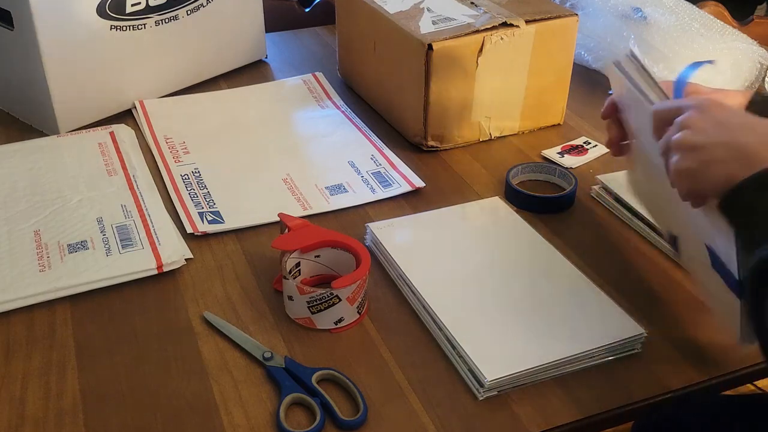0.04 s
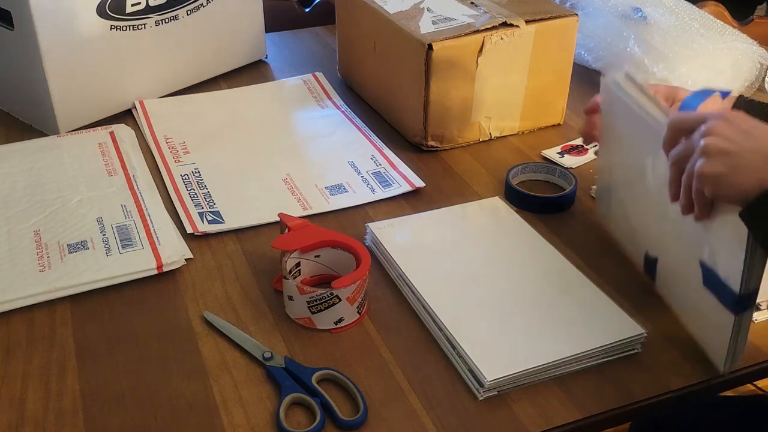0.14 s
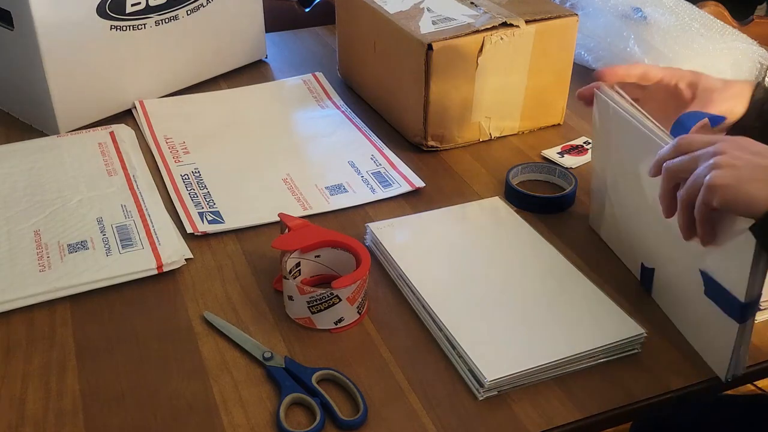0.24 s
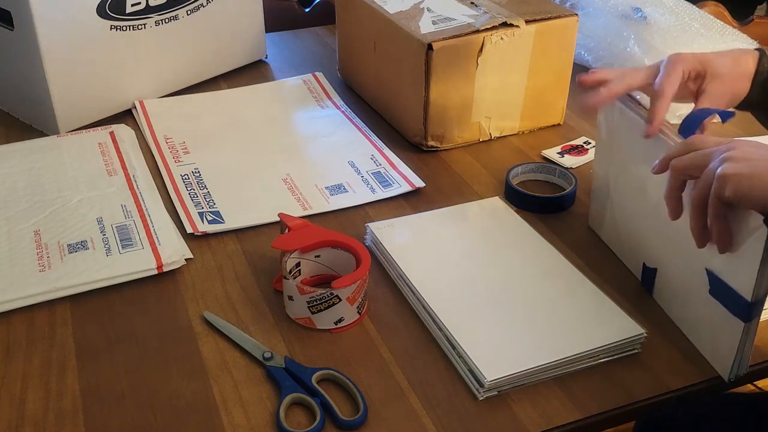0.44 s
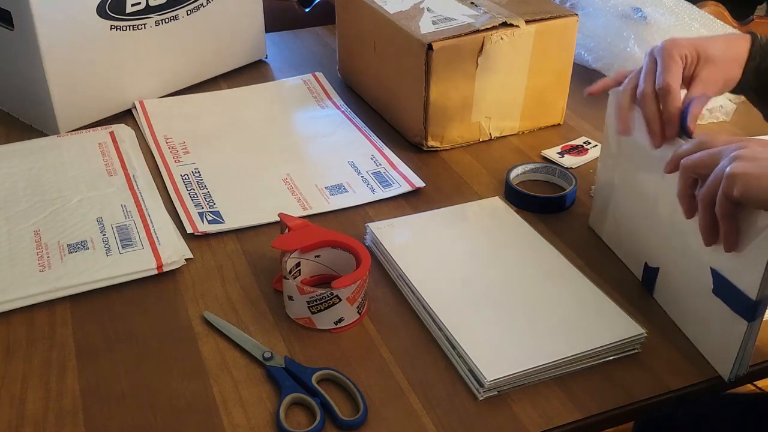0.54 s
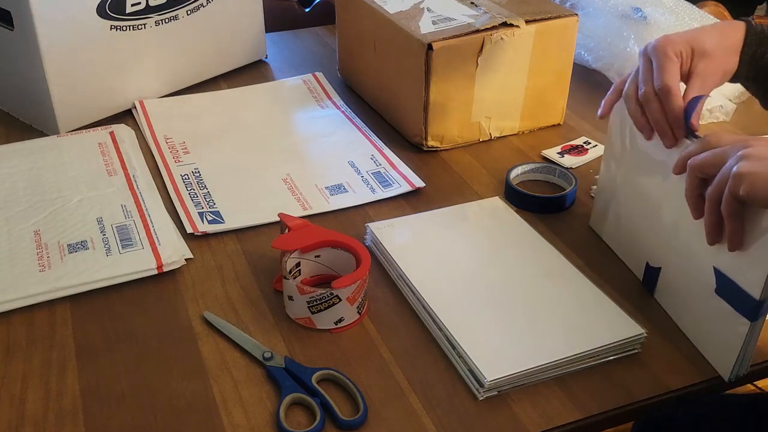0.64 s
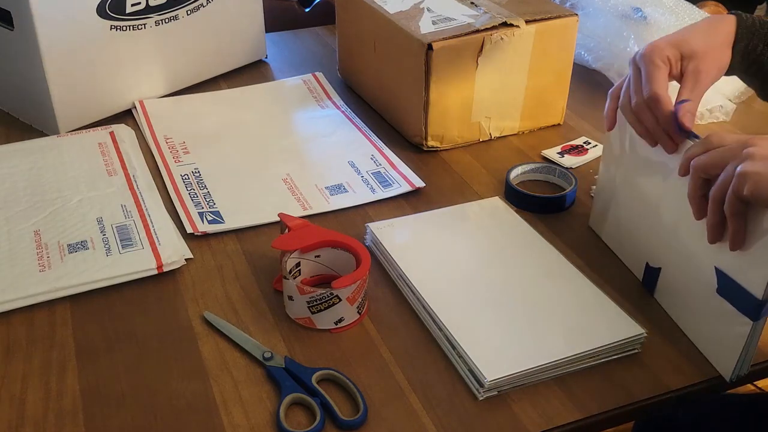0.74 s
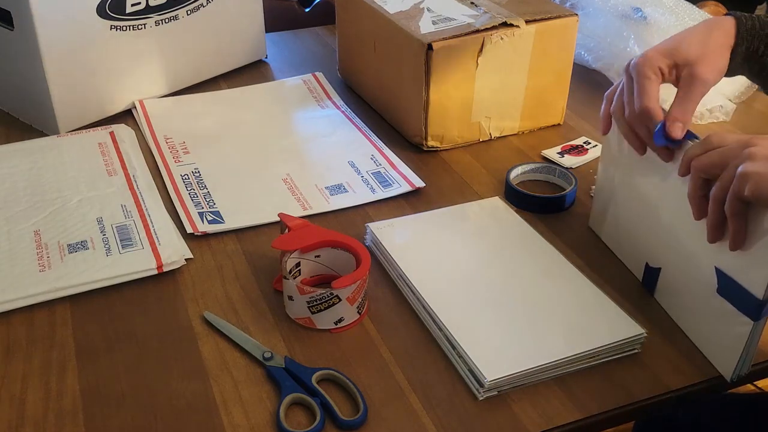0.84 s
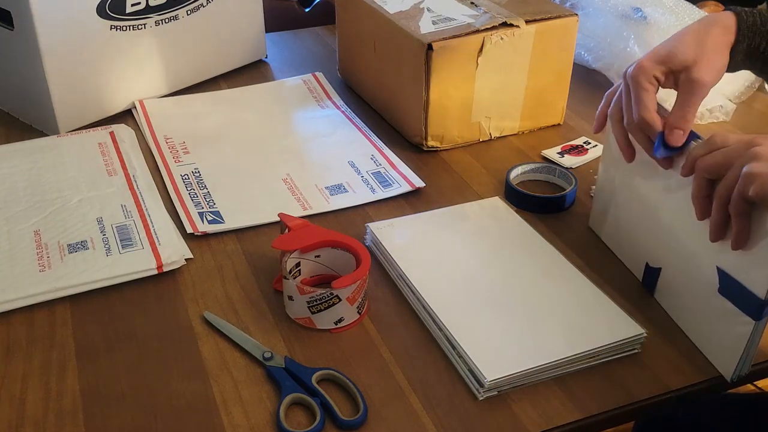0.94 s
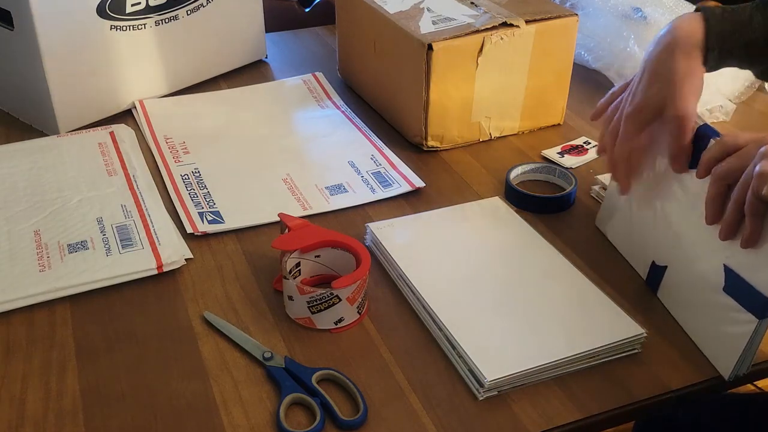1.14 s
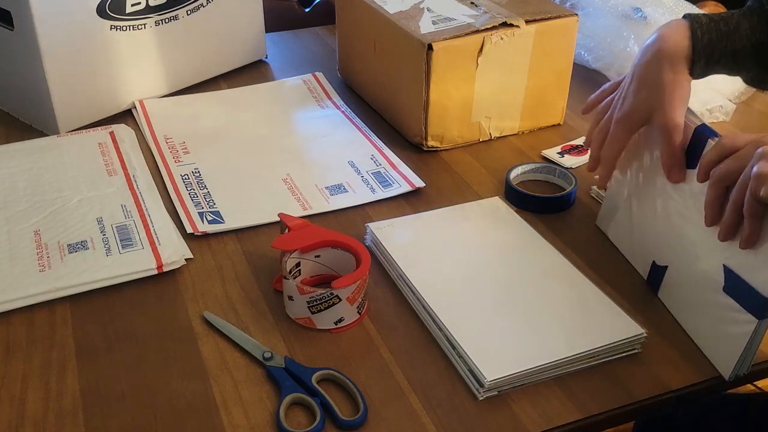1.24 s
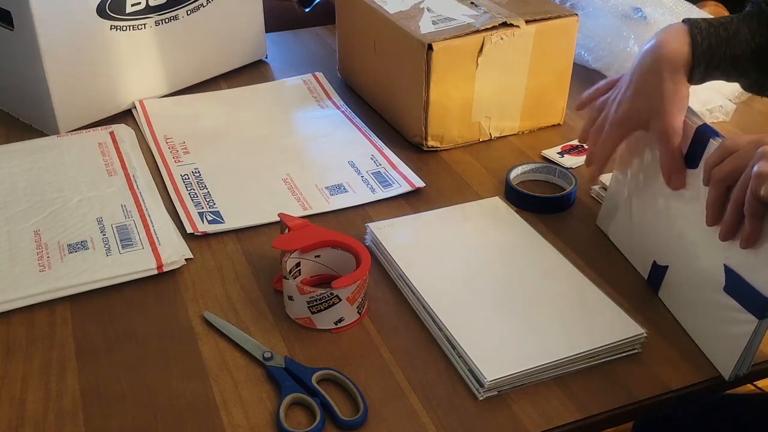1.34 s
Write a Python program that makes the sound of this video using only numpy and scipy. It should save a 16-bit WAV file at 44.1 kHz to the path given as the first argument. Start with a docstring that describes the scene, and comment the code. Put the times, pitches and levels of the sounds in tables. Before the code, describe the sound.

One knock of bagged comics against a wooden tabletop, followed by soft plastic and tape handling.

```python
"""Fingers shift faintly on a taped stack of bagged comics, then knock it once, edge down, on a wooden
table in a small room. The plastic sleeves crack as their edges land, the paper thuds, the tabletop
booms and loose things on it ring faintly. The stack settles with a lighter bump. Fingers slide over
the sleeves with small snaps of plastic, then pinch a strip of tape and rub it down.
A low room hum lies under it all."""
import sys
import numpy as np
from scipy import signal
from scipy.fft import rfft, irfft
from scipy.io import wavfile

SR = 44100
rng = np.random.default_rng(int(sys.argv[2]) if len(sys.argv) > 2 else 0)


def pcm_store(signal):
    """Save signal as 16-bit PCM."""
    levels = np.round(np.clip(np.atleast_2d(signal), -1, 1) * 32767)
    wavfile.write(sys.argv[1], SR, levels.astype(np.int16).T)


N = 61739

# edges of the stack landing, relative levels: start_s, crack_db, push_db
CONTACTS = [(0.2422, -18, -14.5), (0.246, -6.5, -9.5), (0.2482, 1.5, -11), (0.2513, -8.5, -3.5),
            (0.2532, -25, 0.5), (0.2580, -22, -1)]
# how alike left and right are, for close sounds and for the room: freq_hz, likeness (0 to 1)
NEAR_LIKENESS = [(100, 1), (400, 1), (1000, 0.75), (2500, 0.24), (16000, 0.059)]
ROOM_LIKENESS = [(100, 0.91), (300, 0.8), (550, 0.63), (1000, 0.01), (2000, 0), (16000, 0.31)]


def sleeves_crack(gain_db=-2, t60_s=0.012, room_db=-5.5):
    """Each landing edge gives a short, bright crack that the room throws back."""
    # tone of the crack: freq_hz, gain_db
    spectrum = [(200, -6.5), (800, -1.5), (1500, 2.5), (2300, -2.5), (3200, 0.5), (4200, -1), (5300, 3.5),
                (6500, -7), (8000, -7.5), (12000, -10.5), (16000, -4.5)]
    cracks = np.zeros((2, N))
    for start_s, crack_db, _ in CONTACTS:
        add(cracks, start_s, amp(crack_db) * (burst(t60_s) + amp(room_db) * room_tail()))
    return amp(gain_db) * colour(cracks, spectrum)


def stack_thud(gain_db=-4, blow_db=-5, blow_t60_s=0.0084, ring_t60_s=0.14, room_db=-2):
    """Each push on the table is a dull blow, then the dense, short ring of paper on wood."""
    # tone of the thud: freq_hz, gain_db
    spectrum = [(30, -27), (60, -4), (130, -1), (170, -11), (230, -14.5), (320, -2), (500, -3), (750, 0.5),
                (1000, -8), (1500, -15), (3000, -21.5), (8000, -45)]
    thuds = np.zeros((2, N))
    for start_s, _, push_db in CONTACTS:
        blow = amp(blow_db) * burst(blow_t60_s)
        add(thuds, start_s, amp(push_db) * (blow + burst(ring_t60_s) + amp(room_db) * room_tail()))
    return amp(gain_db) * colour(thuds, spectrum)


def tabletop_boom(gain_db=2.5, build_s=0.032, spread_rad_per_hz=0.00057):
    """The heaviest push bends the table down and sets it ringing; the boom takes a moment to build."""
    # modes of the tabletop: pitch_hz, relative_db, t60_s
    modes = [(35.1, -31.5, .85), (48.43, -19.5, 0.39), (56.6, -22.5, 0.3), (104.3, -29, 0.41),
             (136.2, -28, 0.32), (191.4, -35, 0.313), (284.8, -29.5, 0.33), (325, -35, 0.34),
             (491.3, -40.5, .22), (510.6, -36.5, 0.28), (587, -37.5, 0.28), (728, -34, 0.24),
             (780, -44, 0.27), (948, -42.5, .21), (1130, -48, 0.31), (1317, -42, 0.19)]
    t, boom = np.arange(N) / SR, np.zeros((2, N))
    start_s = max(CONTACTS, key=lambda row: row[2])[0]
    build = 1 - np.exp(-(t / build_s) ** 2)
    for hz, db, t60_s in modes:
        phase = spread_rad_per_hz * hz * rng.standard_normal((2, 1))
        add(boom, start_s, -amp(db) * build * decay(t, t60_s) * np.sin(2 * np.pi * hz * t + phase))
    return amp(gain_db) * boom


def stack_settles(start_s=0.3243, gain_db=-8.5, t60_s=0.0076, room_db=-4):
    """The stack rocks onto its whole edge with a soft, woody bump."""
    # tone of the bump: freq_hz, gain_db
    spectrum = [(60, -19), (300, -9.5), (600, -3), (950, -7.5), (1250, -14.5), (1700, -30), (8000, -60)]
    bump = np.zeros((2, N))
    add(bump, start_s, burst(t60_s) + amp(room_db) * room_tail())
    return amp(gain_db) * colour(bump, spectrum)


def loose_things(gain_db=4):
    """The sharpest crack of the landing jars the scissors and tape rolls on the table."""
    # their faint ringing: pitch_hz, relative_db, t60_s
    modes = [(2013, -51.5, 0.28), (2740, -45, 0.22), (3300, -43, 0.18), (3740, -53.5, 0.32),
             (4187, -45, 0.16)]
    t, ringing = np.arange(N) / SR, np.zeros((2, N))
    start_s = max(CONTACTS, key=lambda row: row[1])[0]
    for hz, db, t60_s in modes:
        tone = np.sin(2 * np.pi * (hz * t + rng.random((2, 1))))
        add(ringing, start_s, amp(db) * decay(t, t60_s) * tone)
    return amp(gain_db) * ringing


def plastic_snaps(gain_db=-2, t60_s=0.019):
    """The handled plastic gives a few small, dry snaps."""
    # snaps: start_s, relative_db
    cues = [(.126, -42), (.5565, -37.5), (.686, -34), (.7665, -32), (.867, -42), (1.0548, -30),
            (1.2275, -19), (1.3118, -30.5), (1.332, -31.5)]
    # tone of a snap: freq_hz, gain_db
    spectrum = [(200, -20), (800, -1.5), (1500, -6), (3200, -1), (5200, -1), (9000, -6), (16000, -5)]
    snaps = np.zeros((2, N))
    for start_s, db in cues:
        add(snaps, start_s, amp(db) * burst(t60_s))
    return amp(gain_db) * colour(snaps, spectrum)


def finger_slide(gain_db=-1):
    """Fingers shift their grip on the sleeves with a crackly swish."""
    # swells of the slide: time_s, relative_db
    stroke = [(0, -75), (.055, -90), (.122, -64), (.19, -76), (.22, -84), (.39, -61.5), (.448, -67.5),
              (.47, -86), (.512, -90), (.53, -69.5), (.59, -65), (.63, -52.5), (.69, -69.5), (.725, -84),
              (.8, -76), (.885, -67), (.97, -92), (1.04, -100)]
    # tone of the sleeves: freq_hz, gain_db
    spectrum = [(200, -7), (600, -5), (1100, -9), (2000, -6), (4000, -0.5), (6000, -2), (9000, -4.5),
                (13000, -1.5), (15500, -9)]
    return amp(gain_db) * friction(stroke, spectrum, slips_per_s=3200, slip_db=-4.5, spread_db=7.0)


def thumb_rub():
    """A thumb rubs the tape down onto the stack with a full, midrange scuff."""
    # swell of the rub: time_s, relative_db
    stroke = [(1.09, -72), (1.112, -61.5), (1.155, -61.5), (1.18, -50.5), (1.21, -49.5), (1.23, -46),
              (1.25, -53.5), (1.29, -61), (1.32, -64.5), (1.36, -112)]
    # tone of the rubbed tape: freq_hz, gain_db
    spectrum = [(120, -15.5), (280, -0.5), (450, 3.5), (650, -2), (900, -1), (1300, 1.5), (1750, 2),
                (2500, -3), (4500, -4), (8000, -15.5), (15500, -22)]
    return friction(stroke, spectrum, slips_per_s=4200, slip_db=-4, spread_db=2.2)


def tape_pinch(gain_db=-1):
    """Fingertips pinch along the smooth back of the tape with a thin hiss."""
    # swells of the pinch: time_s, relative_db
    stroke = [(1.048, -100), (1.06, -59), (1.096, -54), (1.16, -61), (1.23, -52), (1.29, -72.5),
              (1.335, -68), (1.4, -83)]
    # tone of the hiss: freq_hz, gain_db
    spectrum = [(200, -17), (1500, -18), (2700, -11.5), (3500, 2), (4600, 0.5), (6000, -4), (9000, -0.5),
                (11000, -2), (13000, 2.5), (15500, -9)]
    return amp(gain_db) * friction(stroke, spectrum, slips_per_s=3100, slip_db=-5, spread_db=2.0)


def friction(stroke, spectrum, slips_per_s, slip_db, spread_db):
    """Fine hiss and tiny slips of uneven size under a stroke."""
    slipping = rng.random(N) < slips_per_s / SR
    slips = slipping * amp(spread_db * np.minimum(rng.exponential(1, N), 4))
    grit = unit_rms(stereo_noise(NEAR_LIKENESS) * (1 + amp(slip_db) * unit_rms(slips)))
    envelope = amp(np.interp(np.arange(N) / SR, *np.transpose(stroke)))
    return colour(grit * envelope, spectrum)


def room_tail(delay_s=0.0026):
    """The room's diffuse answer to a click, dying at its own speed in each band."""
    # reverb time: freq_hz, t60_s
    reverb_times = [(100, 0.91), (300, 0.35), (800, 0.32), (2000, 0.4), (3700, 0.43), (4700, 0.28),
                    (9000, 0.28), (16000, 0.23)]
    hz, t, bands = signal.stft(stereo_noise(ROOM_LIKENESS), SR, nperseg=256)
    fade = decay(t, curve_at(reverb_times, hz)[:, None])
    tail = signal.istft(bands * fade, SR, nperseg=256)[1][:, :N]
    onset = np.clip(np.arange(N) / SR / delay_s - 1, 0, 1)
    return unit_energy(tail * onset)


def room_tone(rumble_db=-57):
    """Low room rumble with a faint electric hum."""
    # tone of the rumble: freq_hz, gain_db
    spectrum = [(20, -8), (40, -4.5), (62, 0.5), (90, -9.5), (160, -19), (250, -22.5), (450, -24),
                (750, -38), (2000, -45.5), (4000, -42.5), (6000, -44.5), (16000, -43)]
    # partials of the hum: pitch_hz, level_db
    partials = [(60, -65.5), (119.5, -64.5), (172, -74)]
    t = np.arange(N) / SR
    shape = amp(curve_at(spectrum, np.fft.rfftfreq(N, 1 / SR)))
    rumble = irfft(rfft(stereo_noise(ROOM_LIKENESS)) * shape, N)
    hum = sum(amp(db) * np.sqrt(2) * np.sin(2 * np.pi * (hz * t + rng.random())) for hz, db in partials)
    return amp(rumble_db) * unit_rms(rumble) + hum


def burst(t60_s):
    """A close, dying burst of noise of unit energy."""
    return unit_energy(stereo_noise(NEAR_LIKENESS) * decay(np.arange(N) / SR, t60_s))


def stereo_noise(likeness):
    """White noise whose stereo width follows a likeness curve over frequency."""
    left, other = rfft(rng.standard_normal((2, N)))
    alike = np.clip(curve_at(likeness, np.fft.rfftfreq(N, 1 / SR)), -1, 1)
    right = alike * left + np.sqrt(1 - alike ** 2) * other
    return irfft(np.array([left, right]), N)


def colour(x, spectrum):
    """Minimum-phase EQ of unit energy: nothing rings ahead of an attack."""
    log_gain = np.log(amp(curve_at(spectrum, abs(np.fft.fftfreq(4096, 1 / SR)))))
    taps = np.fft.ifft(np.exp(np.conj(signal.hilbert(log_gain)))).real
    return signal.fftconvolve(x, unit_energy(taps)[None], axes=1)[:, :x.shape[1]]


def curve_at(points, hz):
    """A curve read on a log-frequency axis."""
    freq_hz, value = np.transpose(points)
    return np.interp(np.log(hz + 1), np.log(freq_hz), value)


def decay(t, t60_s):
    """A fade of 60 dB every t60_s."""
    return amp(-60 * t / t60_s)


def amp(db):
    """Decibels to gain."""
    return 10 ** (np.asarray(db) / 20)


def unit_rms(x):
    """Scaled to rms 1."""
    return x / np.sqrt(np.mean(x ** 2) + 1e-20)


def unit_energy(x):
    """Scaled to energy 1 per channel."""
    return x / np.sqrt(np.sum(x ** 2, -1, keepdims=True) + 1e-20)


def add(mix, start_s, sound):
    """Lays a stereo sound into the mix."""
    part = mix[:, max(round(start_s * SR), 0):][:, :sound.shape[1]]
    part += sound[:, :part.shape[1]]


def scene(hands_room_db=-6, left_lag_s=0.00011):
    """The knock and the hands, slightly later and brighter on the left, over the room tone."""
    # stereo lean: freq_hz, left_minus_right_db
    balance = [(100, 1), (600, -1.5), (1400, 2), (2600, -.5), (5000, 2.5), (9000, 11), (15000, 1)]
    knock = sleeves_crack() + stack_thud() + stack_settles() + tabletop_boom() + loose_things()
    hands = plastic_snaps() + finger_slide() + thumb_rub() + tape_pinch()
    hands_reverb = amp(hands_room_db) * signal.fftconvolve(hands, room_tail(), axes=1)[:, :N]
    hz = np.fft.rfftfreq(2 * N, 1 / SR)
    lean = amp(curve_at(balance, hz) / 2)
    placement = np.array([lean * np.exp(-2j * np.pi * hz * left_lag_s), 1 / lean])
    foreground = irfft(rfft(knock + hands + hands_reverb, 2 * N) * placement)[:, :N]
    return foreground + room_tone()


def record(dry, cutoff_hz=15900):
    """A steep low-pass trims the very top."""
    lowpass = signal.firwin(511, cutoff_hz, window=("kaiser", 9), fs=SR)
    return signal.oaconvolve(dry, lowpass[None], "same")


dry = scene()
out = record(dry)
pcm_store(out)
```